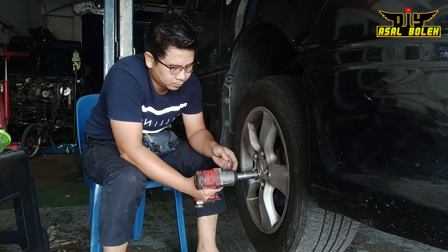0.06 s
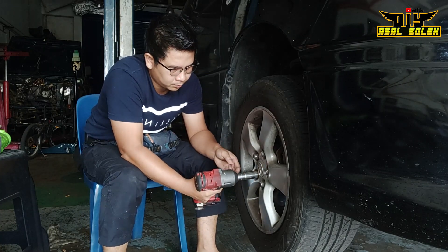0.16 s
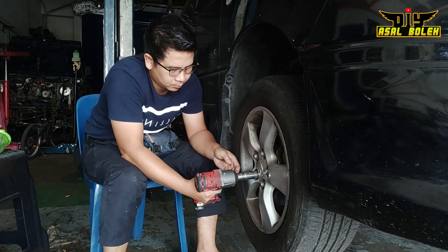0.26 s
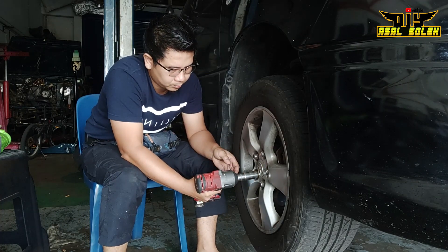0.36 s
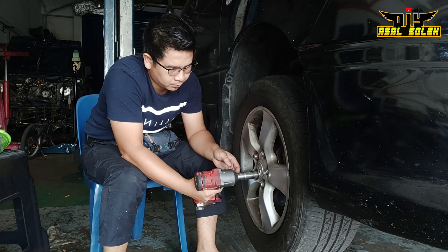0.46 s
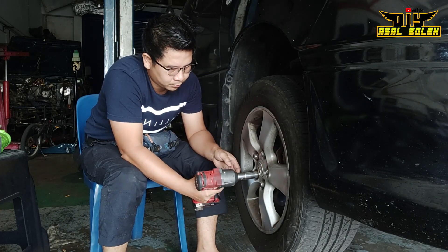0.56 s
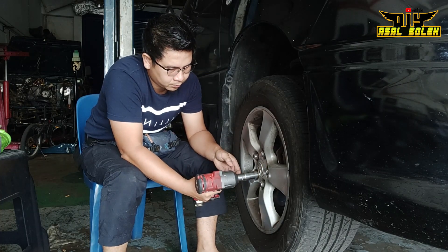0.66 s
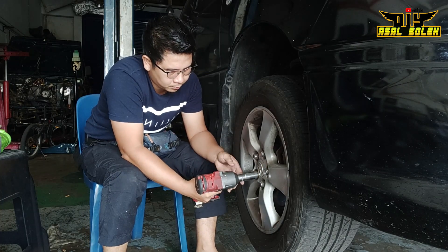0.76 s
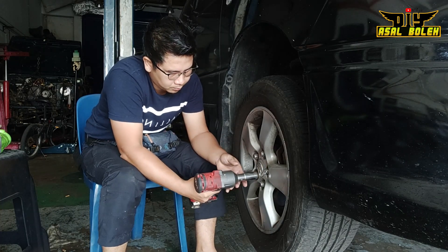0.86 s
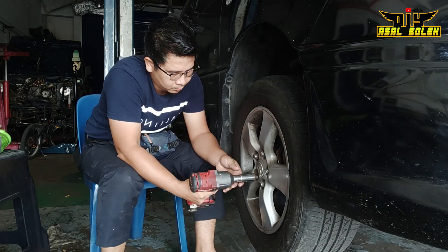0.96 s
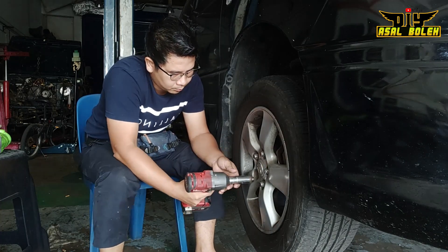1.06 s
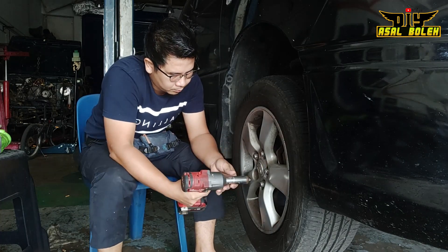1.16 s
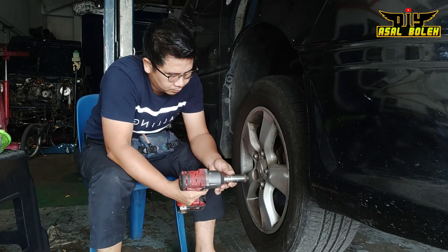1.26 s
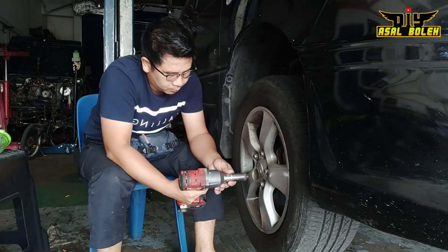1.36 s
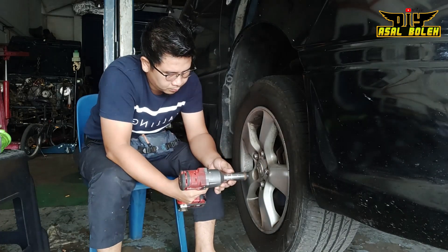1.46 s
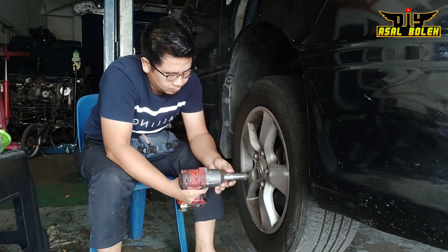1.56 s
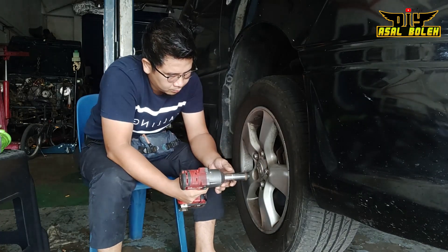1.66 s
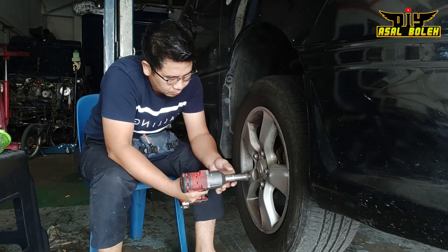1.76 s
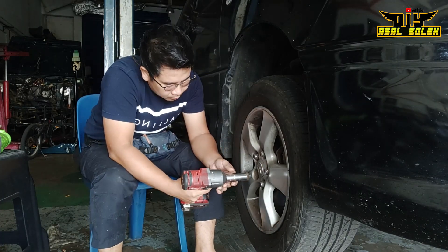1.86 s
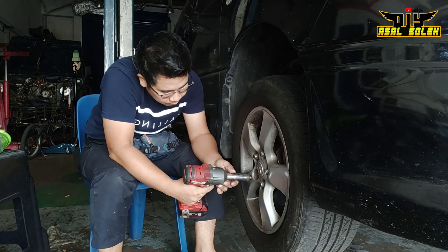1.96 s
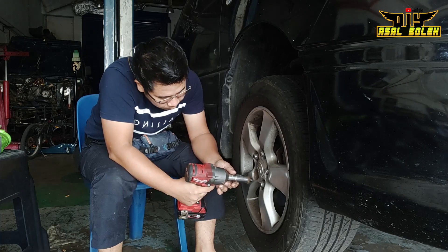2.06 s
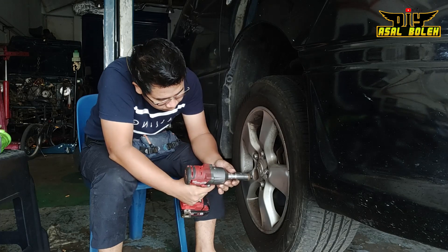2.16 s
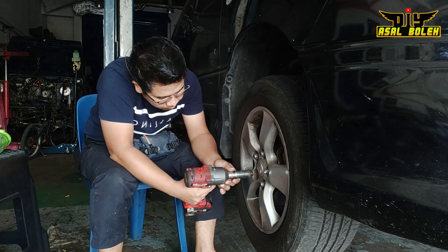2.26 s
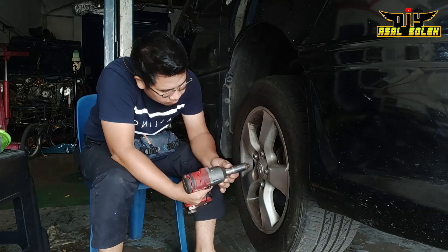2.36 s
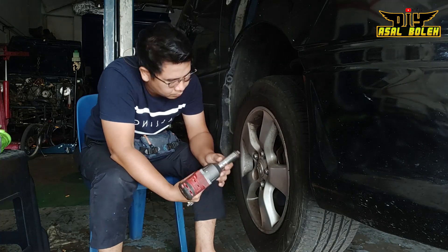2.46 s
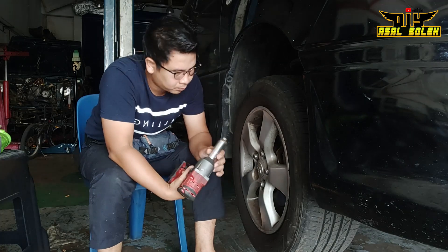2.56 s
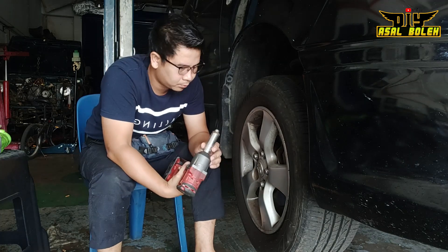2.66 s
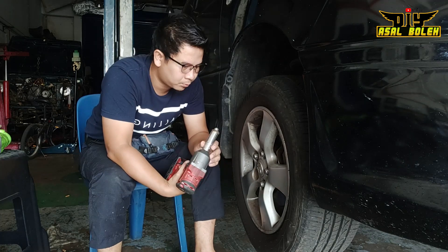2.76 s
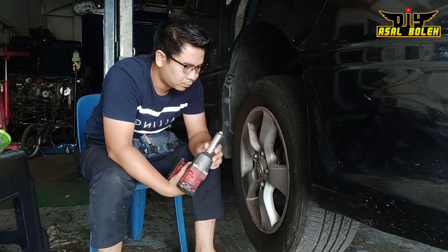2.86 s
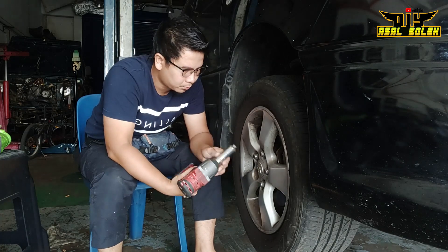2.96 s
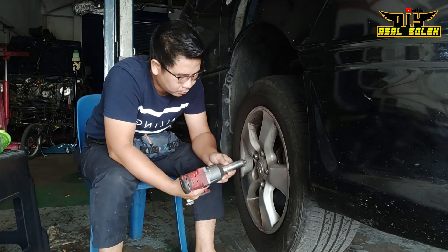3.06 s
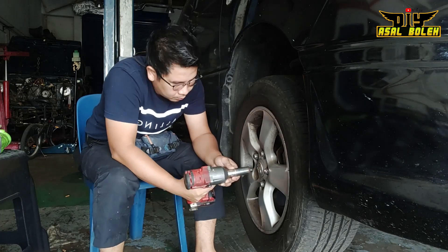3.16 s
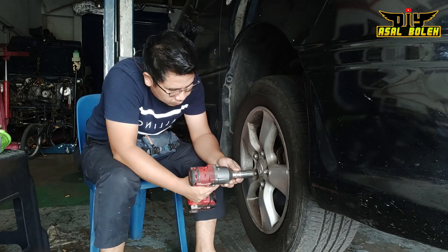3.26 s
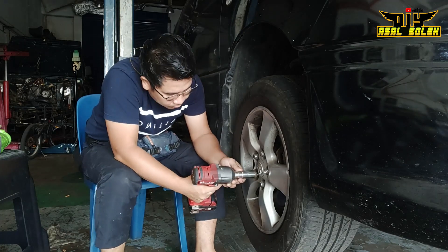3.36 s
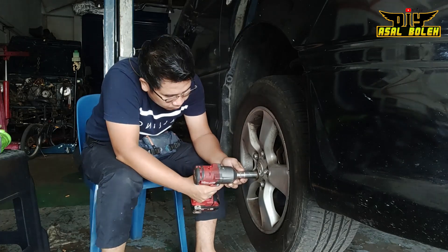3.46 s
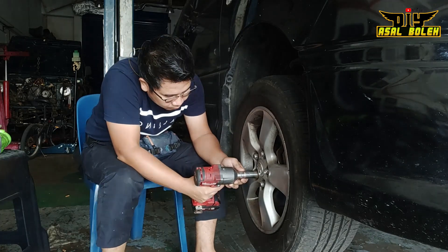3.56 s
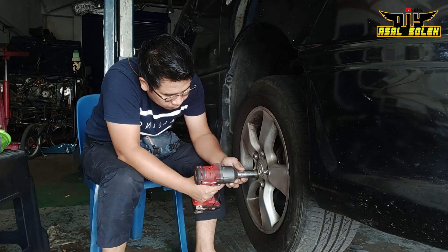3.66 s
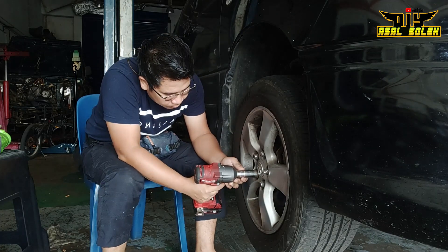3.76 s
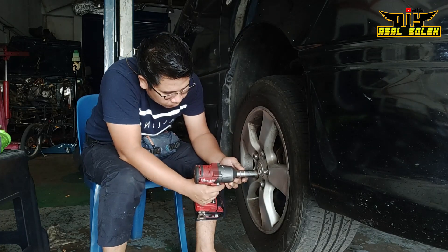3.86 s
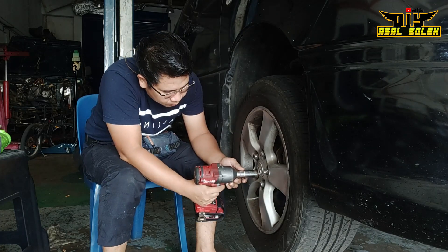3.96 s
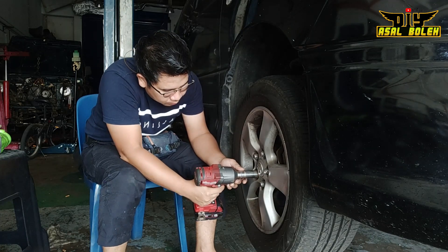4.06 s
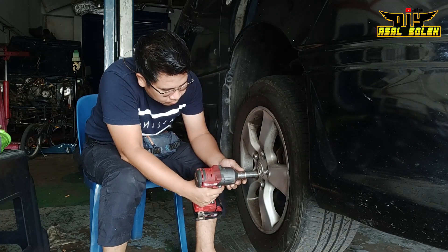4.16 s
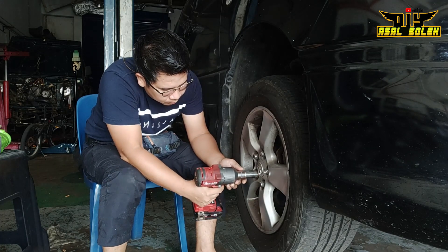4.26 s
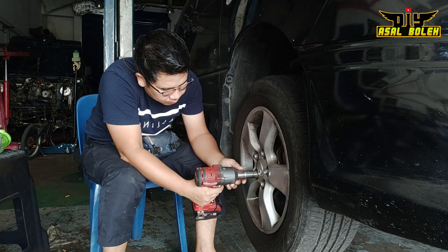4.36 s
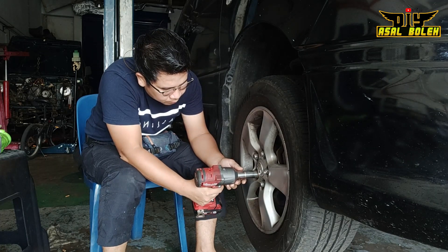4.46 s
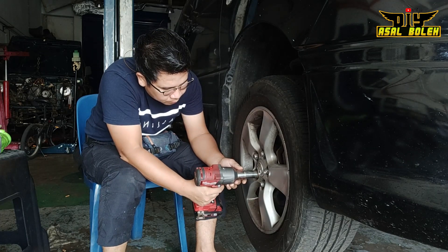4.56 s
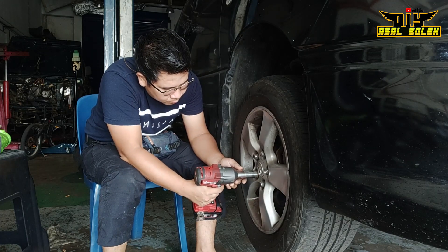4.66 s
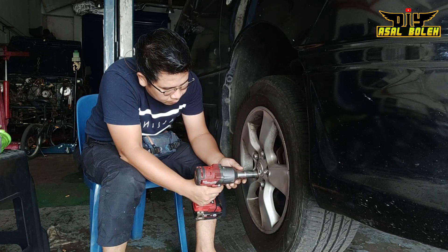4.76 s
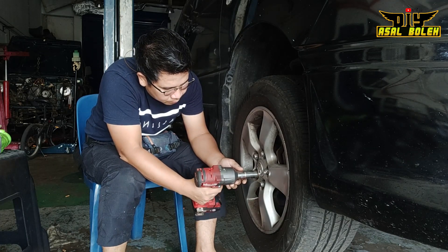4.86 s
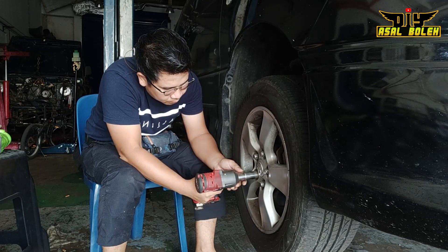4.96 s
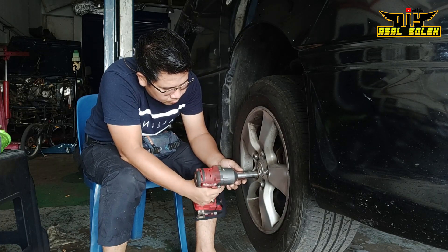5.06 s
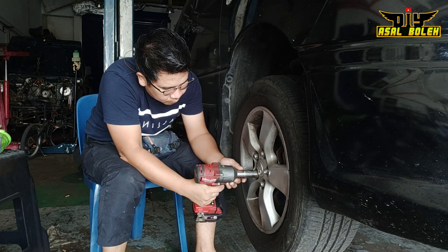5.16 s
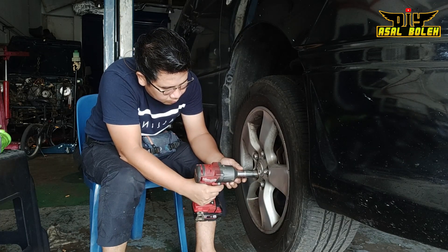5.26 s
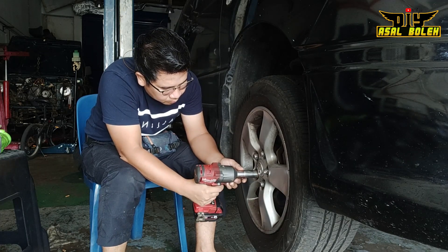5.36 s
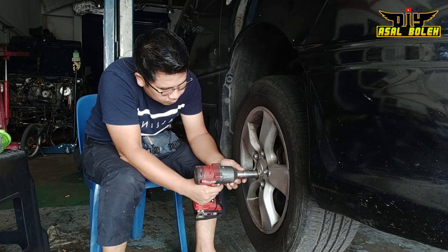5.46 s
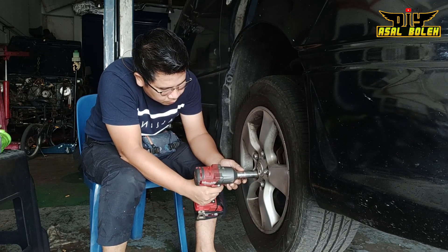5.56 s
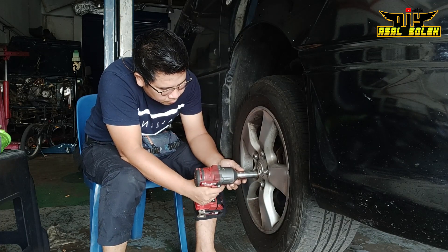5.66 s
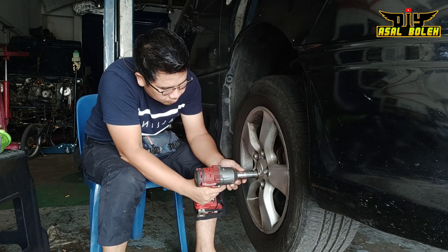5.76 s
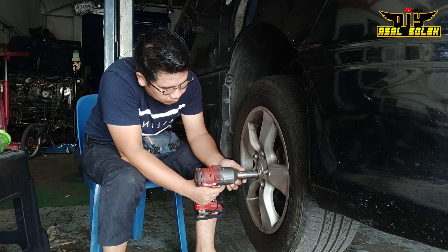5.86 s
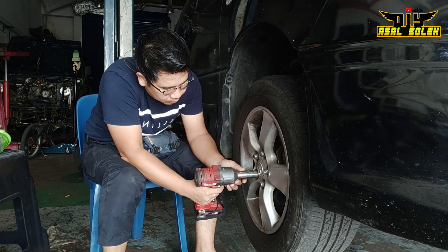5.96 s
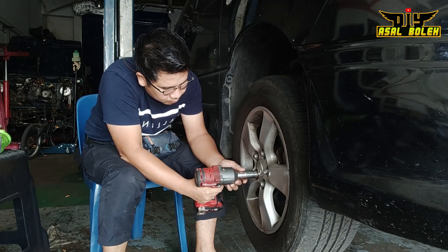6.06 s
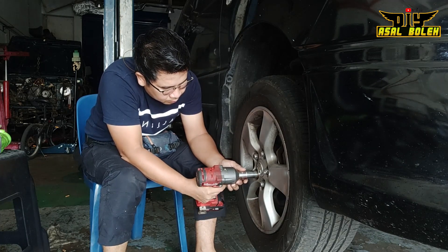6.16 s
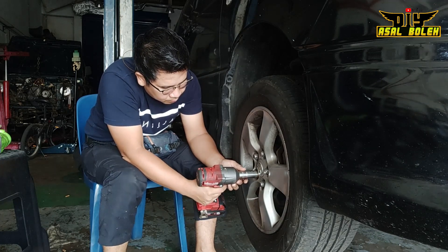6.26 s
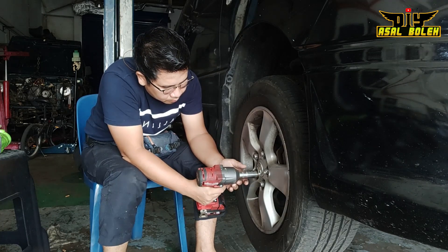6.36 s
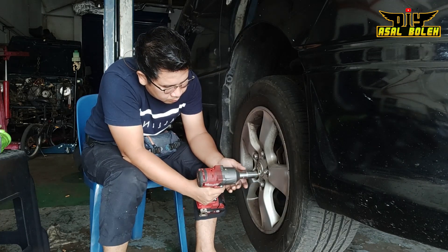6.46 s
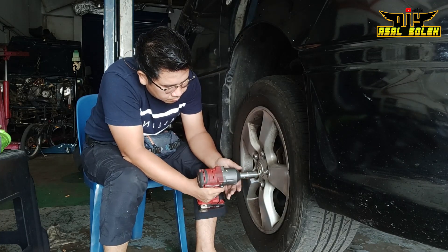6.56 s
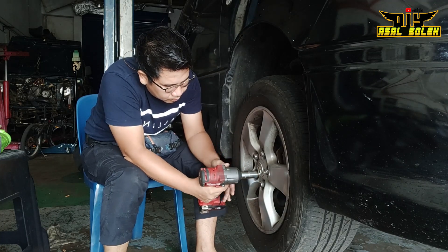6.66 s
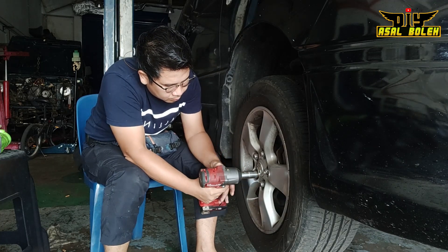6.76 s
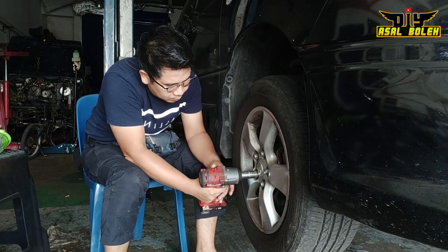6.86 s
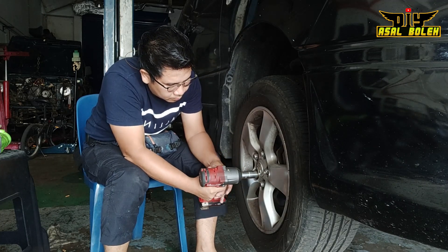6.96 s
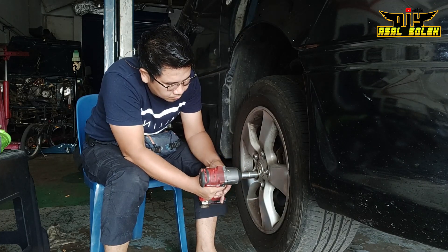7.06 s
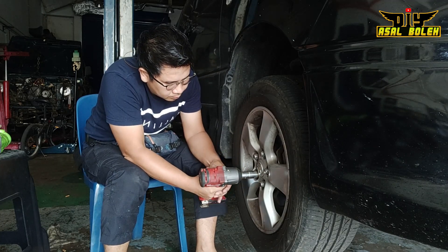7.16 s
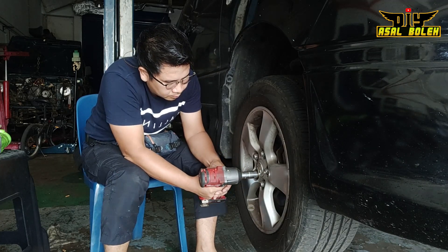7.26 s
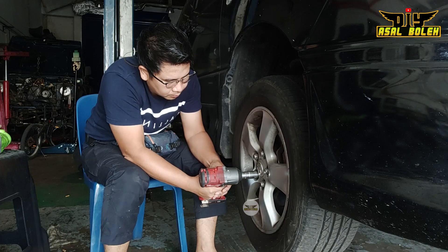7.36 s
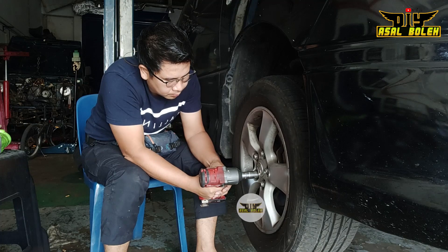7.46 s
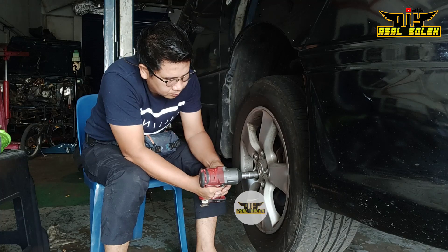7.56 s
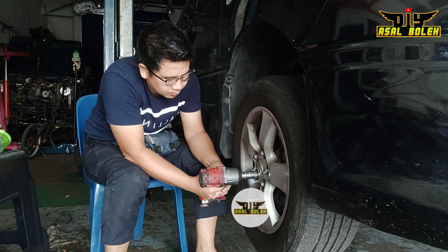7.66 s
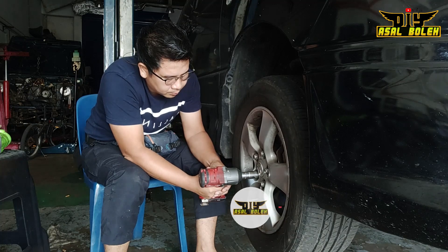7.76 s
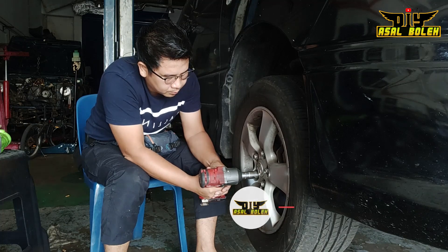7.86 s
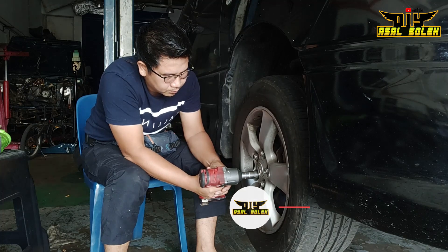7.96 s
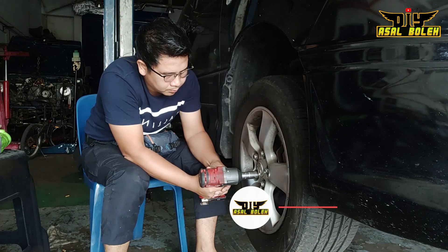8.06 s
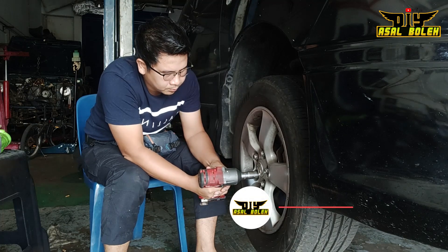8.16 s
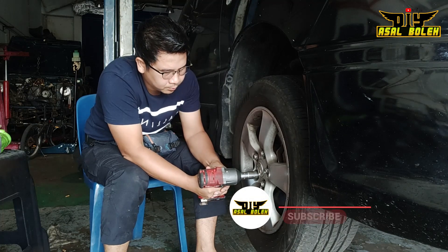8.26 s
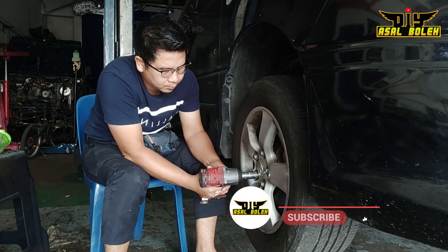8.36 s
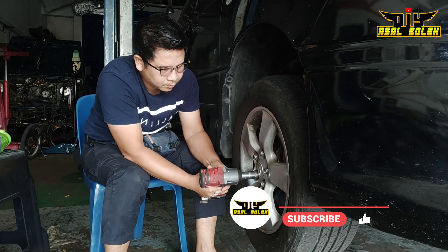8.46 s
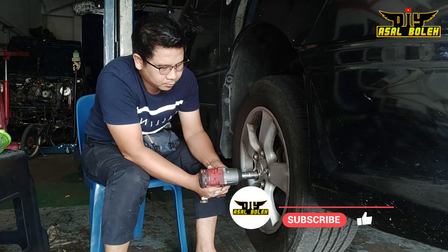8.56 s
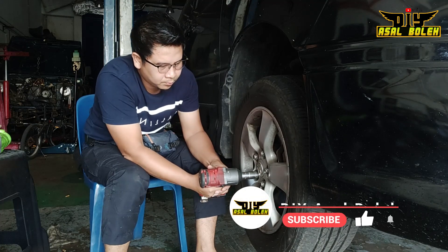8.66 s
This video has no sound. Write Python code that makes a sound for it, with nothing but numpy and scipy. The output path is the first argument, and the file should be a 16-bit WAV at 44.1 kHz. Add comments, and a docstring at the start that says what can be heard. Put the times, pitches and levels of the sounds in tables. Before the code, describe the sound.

At 0 seconds an impact wrench is finishing a pull: one sharp metallic blow, then the whirr coasts down. At about 0.5 it spins freely, gears whining, with clacks near 0.8 and a low wheel rumble. A small bright clink comes at 1.2, followed by faint rubbing and a thin electronic whistle around 1.6. Another clean whirr rises at 1.9 and rattles down by 2.3. From 2.5 to 4.5 it is quiet: fading rotor whisper, distant throbbing hum, dull murmur, a faint tap, a tiny rising squeak at 3.7 and a light clack at 3.9. Short pulls resume at 4.6, 5.1, 5.6, 5.8, 6.3 and 6.7, with hard clacks and isolated or clustered hammer blows. From about 7.2 to the end near 8.7, loud steady hammering at roughly 53 blows a second, harsh, steely and ringing, fills the hard-walled workshop.

```python
"""A cordless impact wrench runs lug nuts onto a car wheel in a hard-walled workshop.
Its hammer lands a few blows in the short trigger pulls, then pounds steadily, about 53 blows a second:
each blow is a shaped noise crack with short tuned knocks. Gear teeth rasp and sing with the shaft speed,
the motor drive whistles, the rotor whispers, and the loose socket clacks as bursts of coloured noise.
A throbbing tone is a machine humming far off, over a dull, patchy low murmur and room noise."""
import sys
import numpy as np
from scipy import signal
from scipy.fft import rfft, irfft, next_fast_len
from scipy.io import wavfile
from scipy.ndimage import uniform_filter1d, map_coordinates

SR = 44100
rng = np.random.default_rng(int(sys.argv[2]) if len(sys.argv) > 2 else 0)


def dump_mix(stems):
    """Bounce the given channels to the path in sys.argv[1] as a 16-bit WAV at rate SR."""
    frames = np.atleast_2d(stems).T  # one column per channel
    limited = np.clip(frames, -1, 1)  # hard clip at full scale
    pcm = np.round(limited * 32767).astype(np.int16)
    wavfile.write(sys.argv[1], SR, pcm)


N = 383653

# All dB columns are relative levels; the functions scale each layer as a whole.
# Hammer blows in the short pulls. Each row: start in seconds, crack in dB, knock in dB, knock pitch in Hz.
SHORT_PULL_BLOWS = [(.063, -12, -10, 800), (4.719, -14.5, -11, 503), (5.135, -11.5, -13, 571),
                    (5.1638, -12, -9, 643.5), (5.1864, -17.5, -8.5, 494.4), (5.2055, -9.5, -16, 470),
                    (5.225, -14, -12, 810), (5.787, -11.5, -16.5, 627), (5.8472, -17.5, -15, 301),
                    (5.8904, -12.5, -12.5, 424), (5.935, -19.5, -16.5, 251), (6.369, -12, -7, 760),
                    (6.824, -13.5, -14.5, 500), (6.8674, -11.5, -12.5, 359.2), (7.2215, -10, -9.5, 555)]
# Pace of the steady hammering. Each row: time in seconds, blows per second.
POUNDING_RATE = [(7.247, 46), (7.29, 55), (7.45, 55.4), (7.75, 53.2), (8.2, 53.2), (8.7, 52.7)]
# Force of the steady hammering. Each row: time in seconds, crack in dB, knock in dB.
POUNDING_FORCE = [(7.3, -13, -9.5), (7.6, -12, -7.5), (8.7, -11, -7)]
# Colour of struck steel. Each row: frequency in Hz, density in dB per Hz.
STEEL_COLOUR = [(710, -29.5), (1200, -11), (2060, -5.5), (3030, -4), (5370, -4.5), (7110, -0.5),
                (8730, -0.5), (10700, -8.5), (13900, -2), (15800, -20)]
# Colour of the dull thud and of the wheel's rumble. Each row: frequency in Hz, density in dB per Hz.
THUD_COLOUR = [(25, -37), (60, -6), (140, -6.5), (450, -7), (1100, 1), (4000, -18.5)]
# Ringing of wheel and anvil under the hammer. Each row: frequency in Hz, full width in Hz, level in dB.
WHEEL_MODES = [(4308, 20, -2), (5744, 40, 0), (6723, 32, -2), (7267, 45, -3), (8055, 30, -3),
               (8879, 45, -2)]
# Overtones 10 to 12 of the blow rate, strengthened in the knocks. Each entry: frequency in Hz.
BLOW_HARMONICS_HZ = [531, 580, 638]
# Trigger pulls. Each row: start in seconds, time held in seconds, shaft speed aimed at in Hz,
# coasting time in seconds, whirr at the working speed in dB.
TRIGGER_PULLS = [(-.15, 0.18, 330, 0.12, -21), (0.489, .175, 435, .19, -27), (1.565, 0.34, 7.4, .02, -25),
                 (1.93, .17, 485, .215, -27.5), (4.597, 0.11, 205, .38, -23),
                 (5.066, .16, 280, 0.12, -24.5), (5.626, .155, 75, 0.026, -26.5),
                 (5.775, 0.16, 210, 0.065, -16), (6.295, 0.08, 345, 0.26, -24),
                 (6.701, .16, 355, 0.22, -26), (7.147, 1.7, 330, .1, -21)]
# Gear tones. Each row: multiple of the shaft speed, level in dB.
GEAR_TONES = [(4.5, 0), (9, 2), (18, -3), (22, -6), (27, -4.5)]
# Colour of the gear case. Each row: frequency in Hz, density in dB per Hz.
CASE_COLOUR = [(40, -36), (90, -26), (300, -24), (600, -13.5), (1500, -7.5), (2300, -10), (3000, -2.5),
               (3800, -5.5), (5200, -12.5), (8100, 1.5), (9600, -8.5), (15000, -17)]
# Resonances of the gear case. Each row: frequency in Hz, half width in Hz, level in dB.
CASE_RESONANCES = [(1450, 100, -11), (2900, 58, -2), (8150, 150, -1.5)]
# Colour of the rotor's whisper. Each row: frequency in Hz, density in dB per Hz.
ROTOR_COLOUR = [(700, -38.5), (1420, -1), (1900, -12.5), (2550, -8.5), (3000, 0), (3600, -3.5), (7200, -16),
                (8150, 2.5), (9000, -17.5), (14000, -36)]
# The socket knocks on the nut, or through its play as the shaft starts, catches or stops.
# Each row: start in seconds, level in dB.
SOCKET_CLACKS = [(.5075, -23), (.7692, -11.5), (.7785, -18), (1.137, -44.5), (2.2585, -14), (3.304, -53.5),
                 (3.865, -52.5), (3.908, -24.5), (3.913, -34), (4.6275, -13.5), (4.7055, -14), (4.713, -5),
                 (4.7835, -12), (5.0988, -9), (5.13, -4), (5.282, -14.5), (5.327, -19.5), (5.6521, -17.5),
                 (5.842, -8), (6.708, -29), (6.833, -4.5), (7.1642, -19.5), (7.212, -13.5)]
# Colour of a clack. Each row: frequency in Hz, density in dB per Hz.
CLACK_COLOUR = [(120, -47), (200, -28), (1610, -14.5), (2490, -12), (6000, -12), (8030, 2.5), (9640, -12.5),
                (12900, -7.5), (15800, -26.5)]
# Ringing of nut and stud. Each row: frequency in Hz, half width in Hz, level in dB.
STUD_MODES = [(860, 36, -2.5), (2010, 57, -5), (3274, 33, -5), (4550, 49, -9.5)]
# Taps on the free socket. Each row: start in seconds, level in dB.
SOCKET_TAPS = [(1.2336, -26.5), (2.844, -42.5)]
# Modes of the free socket. Each row: frequency in Hz, level in dB, time to fall 60 dB in seconds.
SOCKET_MODES = [(3300, -16, 0.059), (4140, -19, .12), (7380, 10.5, 0.018), (11800, -9, 0.18),
                (11140, 10.5, 0.062)]
# The socket rubs round on the nut. Each row: start in seconds, level in dB.
SOCKET_RUBS = [(1.33, -50), (1.605, -33)]
# Colour of the rubbing. Each row: frequency in Hz, density in dB per Hz.
RUBBING_COLOUR = [(300, -19), (800, -2), (1200, -12.5), (3600, -10.5), (9500, -8.5), (15000, -29.5)]
# Low rumbles: a low band lingers from the start, after the first blow, and the wheel rumbles as a nut spins on
# its stud. Each row: start in seconds, level in dB.
LOW_RUMBLES = [(-.1, -50), (.56, -37.5)]
# Dull bumps while the tool is lined up. Each row: start in seconds, level in dB.
TOOL_BUMPS = [(3.796, -55.5), (3.88, -60), (4.108, -62)]
# Colour of the bumps and of the low murmur. Each row: frequency in Hz, density in dB per Hz.
DULL_COLOUR = [(60, -18.5), (250, -11.5), (430, -5.5), (650, -17), (2000, -29.5), (4000, -43.5),
               (12000, -59.5)]
# Level of the far hum. Each row: time in seconds, level in dB.
HUM_LEVEL = [(.5, -90), (.95, -53), (2.3, -58.5), (2.65, -68.5), (3.6, -54), (4.45, -58), (4.7, -94)]
# Colour of the room noise. Each row: frequency in Hz, density in dB per Hz.
AIR_COLOUR = [(18, -39.5), (60, -9), (300, -17), (3980, -34.5), (8470, -36.5), (15000, -53.5)]
# Reverberation of the workshop. Each row: frequency in Hz, time to fall 60 dB in seconds.
SHOP_DECAY = [(85, 1), (160, 0.22), (300, 0.7), (900, 0.48), (2000, 0.48), (8000, 0.42), (14000, 0.33)]
# The hammered wheel and the room ring on together. Each row: frequency in Hz, time to fall 60 dB in seconds.
WHEEL_AND_ROOM_DECAY = [(900, .45), (1500, 0.6), (8000, 0.83), (14000, .52)]
# Colour difference between the two channels. Each row: frequency in Hz, first minus second in dB.
CHANNEL_DIFFERENCE = [(100, 1.5), (1000, 0.15), (3330, -0.5), (5500, 4), (8300, -1.5), (13000, 4)]

POUND_KNOCK_HZ = 668  # central pitch of the steady hammering's knocks
WORKING_HZ = 320  # shaft speed under full load


def hammer(crack_rise_s=.0024, thud_rise_s=.0012, push_rise_s=.0009, rebound_s=.0028, rebound_db=-9,
           snap_db=-1.5, thud_db=-6.5, push_db=-2.5, push_db_per_octave=-7,
           ring_db=-5, blow_harmonic_db=-3, harmonic_width_hz=7):
    """Impact: cracks ring the wheel, knocks carry overtones of the blow rate, low ones push the tyre hardest."""
    start, crack_db, knock_db, knock_hz = np.vstack([SHORT_PULL_BLOWS, pounding()]).T
    landing = start + .003

    def mode(hz, centre, width):
        return 1j * hz * width / (centre ** 2 - hz ** 2 + 1j * hz * width)

    def wheel(hz):
        return 1 + amp(ring_db) * sum(amp(db) * mode(hz, c, w) for c, w, db in WHEEL_MODES)

    def overtones(hz):
        return 1 + amp(blow_harmonic_db) * sum(mode(hz, c, harmonic_width_hz) for c in BLOW_HARMONICS_HZ)

    crack_noise = hiss() * strikes(start, crack_db, swell(crack_rise_s))
    crack = filtered(coloured(crack_noise, STEEL_COLOUR), wheel)
    snap = knocks(landing - .0012, knock_db + snap_db, 2.3 * knock_hz)
    knock = knocks(landing, knock_db, knock_hz)
    rebound = knocks(landing + rebound_s, knock_db + rebound_db, knock_hz)
    thud = coloured(hiss() * strikes(start, knock_db + thud_db, swell(thud_rise_s)), THUD_COLOUR)

    # the push falls at slightly different moments in the two channels
    low_db = knock_db + push_db + push_db_per_octave * np.log2(knock_hz / POUND_KNOCK_HZ)
    push = np.array([strikes(landing + rng.normal(0, .0006, len(start)), low_db, -swell(push_rise_s))
                     for _ in range(2)])
    push = signal.sosfilt(signal.butter(3, 135, "high", fs=SR, output="sos"), push)

    body = filtered(snap + knock + rebound + thud, overtones) + push
    return shop(crack, wet_db=2.5, decay=WHEEL_AND_ROOM_DECAY) + shop(body, wet_db=-10)


def pounding(spread_octaves=.3):
    """Periodic impact: rows (s, crack dB, knock dB, knock Hz) of blows whose two lugs strike unequally."""
    t = clock()
    begun = t >= POUNDING_RATE[0][0]
    count = np.cumsum(curves(POUNDING_RATE)[0] * begun) / SR
    # a blow falls whenever the running count passes a whole number
    at = np.searchsorted(count, np.arange(int(count[-1]) + 1), side="right")
    crack_db, knock_db = curves(POUNDING_FORCE)
    late, sharp, heavy, high = rng.standard_normal((len(at), 4)).T
    lug = (-1) ** np.arange(len(at))
    start = t[at] + .0003 * late + .0005 * lug
    pitch_hz = POUND_KNOCK_HZ * 2 ** (spread_octaves * high)
    return np.transpose([start, crack_db[at] + sharp, knock_db[at] + lug + heavy / 2, pitch_hz])


def knocks(times, levels_db, pitches_hz):
    """Heavily damped impact: little more than one cycle, in a different phase in each channel."""
    t = clock(SR // 50) - .01
    out = np.zeros((2, N + SR))
    phases = rng.uniform(-np.pi, np.pi, (len(times), 2))
    for s, db, hz, (phase, skew) in zip(times, levels_db, pitches_hz, phases):
        envelope = np.exp(-(hz * t / .5) ** 2)
        shape = envelope * np.cos(2 * np.pi * hz * t + phase + skew * np.array([[.45], [-.45]]))
        first = round((s + t[0]) * SR)
        out[:, first:][:, :len(t)] += amp(db) * shape
    return out[:, :N]


def motor(whirr_db=4, tone_db=-15, sing_growth=.59, grit_db=2, judder=.025, flutter_db=3):
    """Gear meshing: teeth rasp once a turn and sing on shaft multiples that sweep through case resonances."""
    speed, whirr, _ = running()
    shaft = turning(speed * (1 + judder * wobble(900)))
    grit = unit(amp(grit_db * (np.sin(shaft) + wobble(300))))
    rasp = coloured(hiss() * grit, CASE_COLOUR)

    def tooth_tone(multiple, db):
        return amp(db + flutter_db * wobble(150)) * np.sin(multiple * shaft + rng.uniform(0, 2 * np.pi))

    def case(hz):
        return sum(amp(db) * resonance(hz, centre, width) for centre, width, db in CASE_RESONANCES)

    teeth = np.array([sum(tooth_tone(k, db) for k, db in GEAR_TONES) for _ in range(2)])
    # the singing grows with speed and stops once the hammer jerks the shaft about
    free = clock() < POUNDING_RATE[0][0]
    tones = unit(filtered(coloured(teeth * free, CASE_COLOUR), case))
    tones = tones * (speed / speed.max()) ** sing_growth
    return shop(amp(whirr_db) * whirr * (rasp + amp(tone_db) * tones), wet_db=-11)


def running(spin_up_s=.09):
    """Exponential spin-up, linear coasting: shaft speed (Hz), whirr gain and drive current gain."""
    t = clock()
    speed, whirr, current = np.zeros((3, N))
    for start, held, aim_hz, coast, db in TRIGGER_PULLS:
        age = t - start
        spin_up = 1 - np.exp(-np.clip(age, 0, held) / spin_up_s)
        hz = aim_hz * spin_up * np.clip(1 - (age - held) / coast, 0, 1)
        speed = np.maximum(speed, hz)
        whirr = np.maximum(whirr, amp(db) * hz / WORKING_HZ)
        current = np.maximum(current, amp(db) * ((age > 0) & (age < held)))
    return speed, whirr, current


def rotor(level_db=-40, rise_s=.063, t60_s=1.5, run_on_db=19, ring_hz=3010, ring_width_hz=110, ring_db=2):
    """Bearing noise outlasts the gears as the rotor runs on; slower pulls set the case ringing less."""
    t = clock()
    pulls = np.array([np.clip((t - start) / rise_s, 0, 1)
                      * amp(-60 * np.maximum(t - start - held, 0) / t60_s)
                      for start, held, *_ in TRIGGER_PULLS])
    vigour = np.minimum(np.array(TRIGGER_PULLS)[:, 2:3] / WORKING_HZ, 1) ** .5
    level = pulls.max(axis=0)
    # the rotor comes to rest once its level has fallen by run_on_db
    moving = np.clip(level / amp(-run_on_db) - 1, 0, 1)
    whisper = coloured(hiss(), ROTOR_COLOUR)
    case = filtered(whisper, lambda hz: hz < 2 * ring_hz)
    ringing = filtered(case, lambda hz: 1 + amp(ring_db) * resonance(hz, ring_hz, ring_width_hz))
    treble = level * moving * (whisper - case)
    body = (pulls * vigour).max(axis=0) * moving ** .5 * ringing
    return shop(amp(level_db) * (treble + body), wet_db=-1)


def drive(carrier_hz=9950, whistle_db=-18, fade_hz=175):
    """Modulation: the switching whistle splits into two sidebands and fades as the shaft speeds up."""
    speed, _, current = running()
    pulled = uniform_filter1d(current, size=300)
    carrier = turning(carrier_hz + 14 * wobble(150))
    field = 4 * turning(speed)  # the sidebands lie four shaft speeds either side
    slow = np.exp(-(speed / 50) ** 2)
    sidebands = np.sin(carrier + field) + .5 * np.sin(carrier - field)
    sidebands = np.exp(-(speed / fade_hz) ** 2) * sidebands
    whistle = slow * np.sin(carrier) + (1 - slow) * sidebands
    return shop(amp(whistle_db) * pulled * whistle * amp([[2], [-1]]), wet_db=7)


def socket(clack_db=2, buzz_db=-17, knock_ring_db=3, scrape_db=-3, stud_db=8):
    """Contact and modal ringing: clacks and rubbing ring nut and stud; taps ring the free socket."""
    def stud(hz):
        return sum(amp(db) * resonance(hz, centre, width) for centre, width, db in STUD_MODES)

    contact = swell(.0007) + amp(buzz_db) * swell(.003)  # a sharp knock and a short buzz
    clacks = hiss() * strikes(*np.vstack([SOCKET_CLACKS, rattling()]).T, contact)
    clacks = filtered(coloured(clacks, CLACK_COLOUR), lambda hz: 1 + amp(knock_ring_db) * stud(hz))

    t = clock(SR // 2)
    ring = sum(amp(db - 60 * t / t60) * np.sin(2 * np.pi * hz * t) for hz, db, t60 in SOCKET_MODES)
    # the tap takes a moment to build, so the ring starts without a thump
    ring = ring * (1 - np.exp(-t / .00032))
    start, db = np.transpose(SOCKET_TAPS)
    tap = coloured(hiss() * strikes(start, db - 8, swell(.0015)), STEEL_COLOUR)
    clinks = strikes(start, db - 7.5, ring) + tap

    rough = hiss() * unit(amp(.65 * wobble(400)))
    rub = surges(SOCKET_RUBS, rise=.026, t60=.32) * coloured(rough, RUBBING_COLOUR)
    rub = filtered(rub, lambda hz: amp(scrape_db) + amp(stud_db) * stud(hz))
    return shop(amp(clack_db) * clacks + rub, wet_db=-2) + shop(clinks * amp([[2], [-2]]), wet_db=-3.5)


def rattling(per_second=58, level_db=-1.5, scatter_db=10.5):
    """Play in a joint: rows (s, dB) of near-regular socket knocks that fade with the coasting whirr."""
    _, whirr, current = running()
    chance = rng.random((int(per_second * N / SR) - 1, 2))
    at = ((np.arange(len(chance)) + chance[:, 0] / 2) * SR / per_second).astype(int)
    coasting_db = 20 * np.log10(whirr[at] * (current[at] == 0) + 1e-9)
    return np.transpose([at / SR, coasting_db + level_db + scatter_db * (2 * chance[:, 1] - 1)])


def rumble(top_hz=290):
    """Forced vibration: a band of low noise swells and dies away, as when the spinning nut shakes wheel and
    tyre."""
    low = filtered(coloured(hiss(), THUD_COLOUR), lambda hz: hz / (hz + 150) / (1 + (hz / top_hz) ** 4))
    return surges(LOW_RUMBLES, rise=.09, t60=1.1) * unit(low)


def handling(squeak_s=3.72, squeak_length_s=.078, squeak_hz=2110, squeak_hz_per_s=700, squeak_db=-67):
    """Soft contact and friction: dull bumps and one rough, rising squeak as the tool meets the next nut."""
    bumps = coloured(hiss() * strikes(*np.transpose(TOOL_BUMPS), swell(.012)), DULL_COLOUR)
    age = clock() - squeak_s
    stroke = np.exp(-(age / squeak_length_s) ** 2)
    glide_hz = squeak_hz + squeak_hz_per_s * age
    tones = np.array([np.sin(turning(glide_hz + 70 * wobble(430))) for _ in range(2)])
    return shop(bumps + amp(squeak_db) * stroke * tones, wet_db=12)


def murmur(level_db=-66, follows=.2):
    """Nonstationary noise: a dull, patchy low noise that swells slightly with the hum."""
    busy_db, = curves(HUM_LEVEL)
    blobs = filtered(patchy(depth_db=9), lambda hz: hz / (hz + 90) / (1 + (hz / 2400) ** 8))
    return amp(level_db + follows * (busy_db - busy_db.max())) * coloured(blobs, DULL_COLOUR)


def background(hum_hz=220, hum_db=-3, throb_db=7, air_db=-69):
    """Amplitude and frequency modulation: a far hum throbs and wavers over faint, uneven room noise."""
    phase = turning(hum_hz + 5 * wobble(30))
    beat = np.sin(turning(6 + 3 * wobble(5)))
    throb = amp(hum_db + curves(HUM_LEVEL)[0] + throb_db * np.tanh(wobble(17) + beat))
    hum = throb * np.array([np.sin(phase + .7 * wobble(45)) for _ in range(2)])
    return hum + amp(air_db) * coloured(patchy(depth_db=3), AIR_COLOUR)


def shop(x, wet_db, decay=SHOP_DECAY):
    """Reverberation: direct sound plus a diffuse noise tail whose decay depends on frequency."""
    hz, t, z = signal.stft(rng.standard_normal((2, SR)), SR, nperseg=256)
    fading = amp(-60 * t / along(decay, hz)[:, None])
    tail = signal.istft(z * fading, SR, nperseg=256)[1]
    return x + amp(wet_db) * signal.fftconvolve(x, tail / np.linalg.norm(tail[0]), axes=1)[:, :N]


def resonance(hz, centre, width):
    """Simple resonance: a complex response of 1 at its centre, with a half width in Hz."""
    return 1 / (1 + 1j * (hz - centre) / width)


def patchy(depth_db):
    """Nonstationary noise of rms 1, its level varying in patches of time and pitch."""
    z = signal.stft(hiss(), nperseg=1024)[2]
    field = uniform_filter1d(rng.standard_normal(z.shape[1:]), size=4, axis=0)
    field = uniform_filter1d(field, size=11, axis=1)
    return unit(signal.istft(z * amp(depth_db * unit(field)), nperseg=1024)[1][:, :N])


def surges(rows, rise, t60):
    """Attack and exponential decay: an envelope that rises at each (s, dB) and then dies away."""
    t = clock()
    return sum(np.clip((t - s) / rise, 0, 1) ** 2 * amp(db - 60 * np.maximum(t - s - rise, 0) / t60)
               for s, db in rows)


def strikes(times, db, shape):
    """Superposition: one copy of a shape at each time and level."""
    at = np.clip(np.round(times * SR).astype(int), 0, N)
    return signal.fftconvolve(np.bincount(at, amp(db), N + 1), shape)[:N]


def swell(rise):
    """Critically damped pulse that peaks at 1 after rise seconds."""
    u = clock(SR // 8) / rise
    return u * np.exp(1 - u)


def hiss():
    """White noise, uncorrelated between the two channels."""
    return rng.standard_normal((2, N))


def coloured(x, spectrum):
    """Minimum-phase filtering: causal colouring that keeps the power of white noise."""
    def response(hz):
        cepstrum = irfft(np.log(unit(amp(along(spectrum, hz))) + 1e-6))
        half = len(cepstrum) // 2
        # folding the cepstrum onto positive times makes the filter causal
        folded = np.r_[cepstrum[0], 2 * cepstrum[1:half]]
        return np.exp(rfft(folded, len(cepstrum)))
    return filtered(x, response)


def filtered(x, response):
    """Linear filtering: the spectrum of x times a response of frequency."""
    m = next_fast_len(N + SR // 2)
    return irfft(rfft(x, m) * response(np.fft.rfftfreq(m, 1 / SR)), m)[..., :N]


def turning(hz):
    """Phase as the running integral of a moving frequency."""
    return 2 * np.pi * np.cumsum(hz) / SR


def wobble(rate):
    """Band-limited randomness: a smooth curve through random knots, rate of them a second."""
    return map_coordinates(rng.standard_normal(int(N * rate / SR) + 4), [clock() * rate])


def curves(rows):
    """Linear interpolation: one value per sample for each column after the time."""
    s, *cols = np.transpose(rows)
    return [np.interp(clock(), s, c) for c in cols]


def along(points, hz):
    """Interpolation of (Hz, value) points on a logarithmic frequency axis."""
    f, v = np.transpose(points)
    return np.interp(np.log(hz + 1), np.log(f + 1), v)


def clock(size=N):
    """Sampled time in seconds."""
    return np.arange(size) / SR


def unit(x):
    """Normalisation to an rms of 1."""
    return x / np.sqrt(np.mean(x ** 2) + 1e-20)


def amp(db):
    """Amplitude ratio of a level in dB."""
    return 10 ** (np.asarray(db) / 20)


def scene():
    """Superposition of all sources."""
    tool = hammer() + motor() + rotor() + drive() + socket()
    return tool + rumble() + handling() + murmur() + background()


def record(dry, top_hz=15700):
    """Channel colour, soft saturation of the loudest peaks, then a sharp upper band limit."""
    heard = filtered(dry, lambda hz: amp(along(CHANNEL_DIFFERENCE, hz) * np.array([[.5], [-.5]])))
    rounded = heard / (1 + (heard / .9) ** 4) ** (1 / 4)
    return filtered(rounded, lambda hz: hz < top_hz)


dry = scene()
out = record(dry)
dump_mix(out)
```